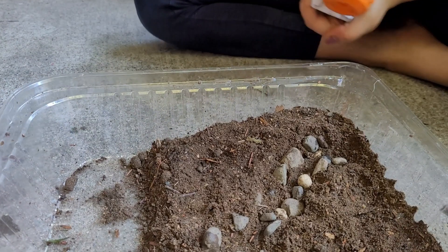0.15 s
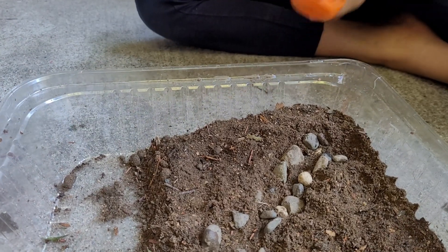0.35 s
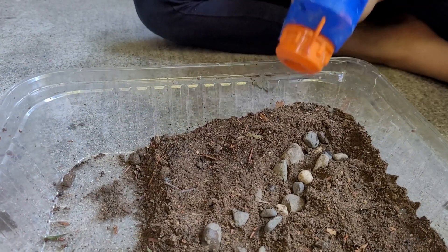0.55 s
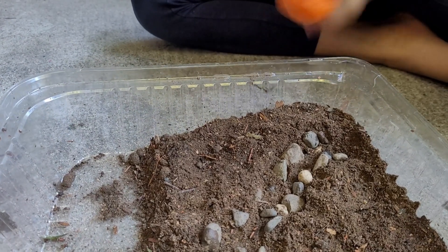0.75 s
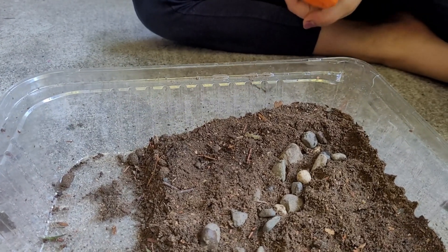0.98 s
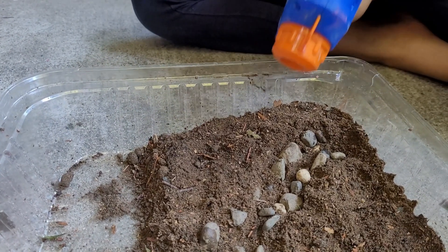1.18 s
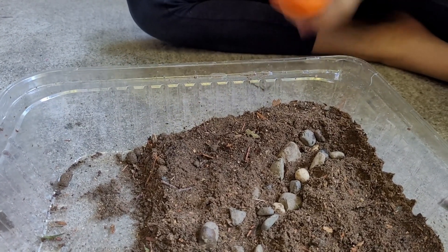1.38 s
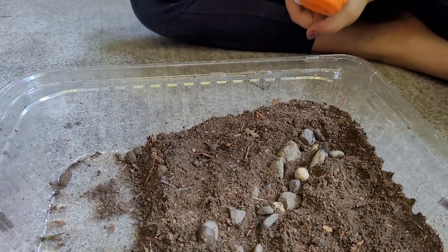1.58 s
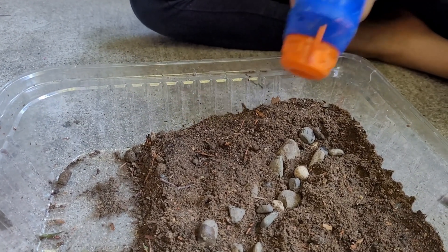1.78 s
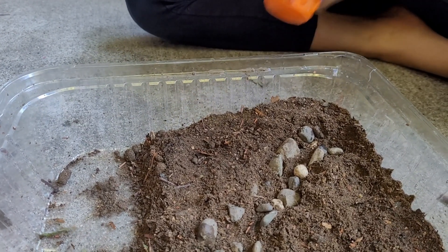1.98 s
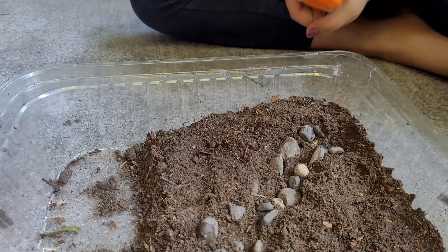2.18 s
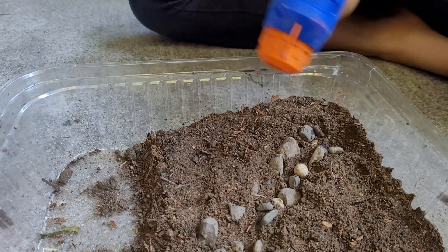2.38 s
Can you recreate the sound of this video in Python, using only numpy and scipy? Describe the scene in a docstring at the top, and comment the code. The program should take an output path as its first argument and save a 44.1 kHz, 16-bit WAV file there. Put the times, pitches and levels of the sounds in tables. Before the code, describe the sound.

A plastic toy water gun is pumped quickly, close by in a small, quiet room. Inward strokes hiss and end in hollow knocks at about 0.2, 0.9, 1.5 and 2.2 seconds. Outward strokes end in sharper knocks at 0.6, 1.2, 1.8 and 2.5 seconds. Faint rubber squeaks and light plunger taps come in between. Around 1.9 seconds the nozzle briefly sputters air and a little water.

```python
"""In a small carpeted room, a plastic toy water gun is pumped quickly over a plastic tub.
On every stroke sliding friction makes a hiss that rises with the plunger's speed, and the rubber seal
hums or squeaks at times. Impact on the stop excites the body's modes: a hollow knock going in, a sharper
one going out. After the third outward stroke the nozzle sputters air and a little water.
The loose plunger taps lightly; faint room noise and a deep rumble lie underneath."""
import sys
import numpy as np
from scipy import signal
from scipy.fft import rfft, irfft, next_fast_len
from scipy.io import wavfile

SR = 44100
rng = np.random.default_rng(int(sys.argv[2]) if len(sys.argv) > 2 else 0)


def output_pcm(signal):
    """Save a mono or channel-first signal as 16-bit PCM at the path in sys.argv[1].

    Samples are clipped to [-1, 1] before scaling.
    """
    pcm = np.clip(np.atleast_2d(signal).T, -1, 1) * 32767
    wavfile.write(sys.argv[1], SR, np.round(pcm).astype(np.int16))


N = 108045
T = np.arange(N) / SR


def from_db(db):
    """Amplitude ratio of a level in decibels."""
    return 10 ** (np.asarray(db) / 20)


def unit_rms(x):
    """Normalisation to unit mean power."""
    return x / np.sqrt(np.mean(x ** 2) + 1e-20)


def at_hz(points, hz):
    """Interpolation on a log-frequency axis."""
    freqs, values = np.transpose(points)
    return np.interp(np.log(np.maximum(hz, 1)), np.log(freqs), values)


def pan(db):
    """Left and right gains for a level difference."""
    return from_db(np.array([[.5], [-.5]]) * db)


def since(time):
    """Seconds after an onset, zero before it."""
    return np.maximum(T - time, 0)


def drift(cutoff_hz):
    """Low-pass random modulation of unit rms."""
    lowpass = signal.butter(2, cutoff_hz, fs=SR, output="sos")
    return unit_rms(signal.sosfilt(lowpass, rng.standard_normal(N)))


def roughness(spread_db, cutoff_hz):
    """Log-normal amplitude modulation of unit rms."""
    return unit_rms(from_db(spread_db * drift(cutoff_hz)))


# likeness of the two channels: (frequency [Hz], coherence [1])
COHERENCE = [(60, .87), (280, .92), (600, .7), (1300, .55), (2600, .45), (5000, .4), (7500, .72),
             (14000, .68)]
def stereo_white(size):
    """Partial coherence: a white spectrum, partly shared by two microphones, and its frequencies."""
    hz = np.fft.rfftfreq(size, 1 / SR)
    mid, side = rfft(rng.standard_normal((2, size)))
    alike = at_hz(COHERENCE, hz)
    return (np.sqrt(1 + alike) * mid + np.sqrt(1 - alike) * side * [[1], [-1]]) / np.sqrt(2), hz


# stereo balance: (frequency [Hz], left minus right [dB])
BALANCE = [(300, -0.7), (1200, 0.9), (2500, 3), (4400, 3), (6000, -1), (8400, -1.5), (11500, -.5),
           (14500, 2.5)]
def noise(spectrum):
    """Spectral shaping: stereo noise of unit rms, so the spectrum sets only its colour."""
    size = next_fast_len(N)
    white, hz = stereo_white(size)
    shaped = white * from_db(at_hz(spectrum, hz)) * pan(at_hz(BALANCE, hz))
    return unit_rms(irfft(shaped, size)[:, :N])


# spectra of the room noise and the rumble: (frequency [Hz], relative density [dB])
FLOOR_SPECTRUM = [(12, -29), (25, -11), (36, -19), (52, 6), (66, -5.5), (100, -11), (160, -14.5),
                  (280, -12), (600, -25), (1500, -30), (4000, -43), (9000, -47.5), (15500, -55)]
RUMBLE_SPECTRUM = [(25, -38), (42, -1), (53, 13), (64, -4.5), (110, -46), (400, -76)]
# rumble envelope: (time [s], relative level [dB])
RUMBLE_ENVELOPE = [(0, 18), (0.15, -8), (0.36, -4), (0.44, 16.5), (0.51, 7.5), (0.6, 20), (0.76, -5),
                   (1.3, -7.5), (2.3, -2), (2.45, 14)]
def background(floor_db=-50.5, rumble_db=-59.5):
    """Ambient noise: a stationary floor and a slowly amplitude-modulated rumble."""
    swell_db = np.interp(T, *np.transpose(RUMBLE_ENVELOPE))
    rumble = from_db(rumble_db + swell_db) * noise(RUMBLE_SPECTRUM)
    return rumble + from_db(floor_db) * noise(FLOOR_SPECTRUM)


# strength of the diffuse field: (frequency [Hz], level [dB])
REVERB_LEVEL = [(100, -7.5), (200, -7), (310, -12.5), (500, -10), (800, -2), (1300, -11), (2600, -3.5),
                (8000, -6.5), (15000, -6)]
# reverberation time: (frequency [Hz], T60 [s])
REVERB_T60 = [(150, 0.29), (400, 0.17), (1000, .21), (2800, 0.2), (8000, 0.19), (15000, 0.17)]
def reverberation(x, gap_s=0.0026):
    """Absorption makes the diffuse field decay exponentially, each band at its own rate."""
    size = 16384
    white, hz = stereo_white(size)
    t, tail = T[:size], 0
    centres = np.geomspace(100, 16000, 10)
    for centre, weights in zip(centres, np.eye(len(centres))):
        band = irfft(white * at_hz(np.c_[centres, weights], hz) * from_db(at_hz(REVERB_LEVEL, hz)))
        fade = from_db(-60 * t / at_hz(REVERB_T60, centre)) * (t > gap_s)
        tail += band * fade / np.sqrt(np.sum(fade ** 2))
    return signal.fftconvolve(x, tail, axes=1)[:, :N]


# echoes: (delay [s], gain [dB])
REFLECTIONS = [(.0064, -19), (0.0105, -15)]
def early_reflections(x, cutoff_hz=690):
    """Reflection from nearby surfaces returns delayed, duller copies of the sound."""
    dull = signal.sosfilt(signal.butter(1, cutoff_hz, fs=SR, output="sos"), x)
    return sum(from_db(db) * np.array([np.interp(T - delay, T, side, left=0) for side in dull])
               for delay, db in REFLECTIONS)


# left microphone against the right: (frequency [Hz], phase lag [rad])
PHASE_LAG = [(200, 0), (500, 0.02), (1300, 0.74), (1700, 0.5), (2100, 1.46), (3200, 1.68), (4400, .5),
             (5700, 1.5), (6600, -1)]
def direct_sound(x, bass_cut_hz=140):
    """A small source radiates little bass; its sound reaches the left microphone slightly late."""
    x = signal.sosfilt(signal.butter(3, bass_cut_hz, "high", fs=SR, output="sos"), x)
    size = next_fast_len(N + 2048)
    lag = at_hz(PHASE_LAG, np.fft.rfftfreq(size, 1 / SR))
    return irfft(rfft(x, size) * np.exp(1j * lag * [[-.5], [.5]]), size)[:, :N]


# light contacts: (time [s], level [dB])
TAP_EVENTS = [(0.013, -49), (0.032, -46), (0.079, -46.5), (0.446, -40.5), (0.694, -42), (0.742, -43),
              (0.768, -50.5), (1.126, -34), (1.301, -38.5), (1.332, -43.5), (1.371, -42.5), (1.783, -47),
              (2.012, -32), (2.079, -39)]
# their spectrum: (frequency [Hz], relative density [dB])
TAP_SPECTRUM = [(120, -11), (300, -2), (480, 9), (750, -4.5), (1300, -5), (2500, -13.5), (8000, -20.5),
                (15000, -44)]
def plunger_taps(attack_s=0.0018, decay_s=0.0059):
    """Light impacts of the loose plunger give dull, quickly damped noise bursts."""
    envelope = sum(from_db(db) * np.minimum(since(time) / attack_s, 1) * np.exp(-since(time) / decay_s)
                   for time, db in TAP_EVENTS)
    return envelope * noise(TAP_SPECTRUM)


# spurts: (time [s], level [dB], attack [s], decay [s], spray offset [dB])
NOZZLE_SPURTS = [(1.868, -14, 0.0054, .007, -0.5), (1.885, -16.5, 0.0032, 0.027, -2),
                 (1.91, -15, 0.013, 0.016, 1.5)]
# their low and bright parts: (frequency [Hz], relative density [dB])
SPLUTTER_SPECTRUM = [(70, -13), (150, 5), (230, 2), (310, -3), (500, 5.5), (750, -1.5), (1000, -4.5),
                     (1900, -3.5), (2650, -10), (2950, -15.5), (3600, -22), (4500, -47)]
SPRAY_SPECTRUM = [(1200, -34), (2500, -1), (5000, 4.5), (6000, -3.5), (8200, 4.5), (9600, -7.5),
                  (10800, -1), (13000, -8.5), (15500, -11)]
def nozzle_sputter(spray_db=-8):
    """Unsteady flow of air and water gives ragged spurts: a low splutter and a bright spray."""
    splutter = spray = 0
    for time, db, attack, decay, offset_db in NOZZLE_SPURTS:
        envelope = from_db(db) * np.minimum(since(time) / attack, 1)
        envelope *= np.exp(-since(time + attack) / decay)
        splutter += envelope
        spray += envelope * from_db(offset_db + spray_db)
    ragged = roughness(spread_db=1, cutoff_hz=630)
    return ragged * (splutter * noise(SPLUTTER_SPECTRUM) + spray * noise(SPRAY_SPECTRUM))


# inward and outward strokes: (start [s], stop [s], hiss level [dB], knock gain [dB])
PUSH_STROKES = [(0.168, 0.2483, -33, 2.5), (0.83, 0.9076, -33.5, 1.5), (1.455, 1.5394, -34.5, 1),
                (2.085, 2.1631, -30, 0.5)]
PULL_STROKES = [(0.454, 0.583, -29, 0), (1.103, 1.213, -29, 0.1), (1.725, 1.8387, -26.5, 1),
                (2.324, 2.468, -28.5, -1)]
# friction spectra: (frequency [Hz], relative density [dB])
PUSH_FRICTION = [(90, -39), (180, 13), (300, 10), (480, 11.5), (750, 12), (950, 3.5), (1300, 9.5),
                 (1700, 6.5), (3200, 4), (6500, 2.5), (8200, 4.5), (9800, 1), (12000, -0.5), (15500, -9.5)]
PULL_FRICTION = [(90, -1.5), (200, 10), (330, 8.5), (600, 12.5), (850, 3), (1400, 7), (3000, 2.5),
                 (4300, 5), (6500, -2), (8300, 3.5), (9800, -1.5), (11800, -1.5), (15500, -12)]
def sliding_hiss(strokes, spectrum, speed_power, release_s=0.0087):
    """Friction noise grows as a power of the plunger's speed and dies away at the stop."""
    envelope = 0
    for start, stop, db, _ in strokes:
        progress = np.clip((T - start) / (stop - start), 0, 1)
        speed = np.sin(np.pi / 2 * progress ** 1.35)
        envelope += from_db(db) * speed ** speed_power * np.exp(-since(stop) / release_s)
    return envelope * roughness(spread_db=1.04, cutoff_hz=150) * noise(spectrum)


# hum of the seal: (harmonic number [1], level [dB])
HUM_HARMONICS = [(1, -33.5), (2, -37), (3, -44.5)]
# squeaks: (time [s], duration [s], centre frequency [Hz], relative glide [1], level [dB])
SEAL_SQUEAKS = [(0.482, 0.032, 1242, 0.11, -40), (0.868, 0.018, 1320, 0.029, -34),
                (1.503, 0.021, 2880, .03, -28), (2.15, .018, 3280, 0.039, -26),
                (2.353, 0.024, 496, 0.034, -35), (2.375, 0.019, 1316, .14, -28.5)]
def rubber_seal(hum_end_hz=305.2, rise_hz_per_s=1000, hum_s=.07):
    """Friction-induced vibration: the seal hums, rising late in each pull, and squeaks now and then."""
    out = np.zeros(N)
    waver = 1 + 0.034 * drift(cutoff_hz=95)
    for _, stop, _, _ in PULL_STROKES:
        time_left = np.clip(stop - T, 0, hum_s)
        phase = 2 * np.pi * np.cumsum((hum_end_hz - rise_hz_per_s * time_left) * waver) / SR
        hum = sum(from_db(db) * np.sin(k * phase) for k, db in HUM_HARMONICS)
        out += np.sin(np.pi * time_left / hum_s) * hum
    rough = roughness(spread_db=4, cutoff_hz=270)
    for time, duration, hz, glide, db in SEAL_SQUEAKS:
        progress = np.clip((T - time) / duration, 0, 1)
        pitch = hz * (1 + glide * (progress - .5)) * np.sqrt(waver)
        envelope = from_db(db) * rough * np.sin(np.pi * progress) ** 2
        out += envelope * np.sin(2 * np.pi * np.cumsum(pitch) / SR)
    return out


# lasting modes: (frequency [Hz], level after a push [dB], level after a pull [dB], T60 [s])
RING_MODES = [(211.3, -38, -29.5, 0.21), (287, -24.5, -34.5, 0.15), (376, -16.5, -22.5, 0.074),
              (468, -29.5, -46, 0.094), (545.5, -31, -25.5, 0.17), (748.6, -16.5, -21, .13),
              (800, -30, -21.5, 0.16), (938, -38.5, -36.5, 0.2), (1310, -35, -36, .09),
              (2345, -34.5, -45, 0.15)]
def barrel_ring(swell_s=0.0054, phase_spread_rad=0.23):
    """Free vibration: the hollow barrel and its surroundings ring on after each knock."""
    out = np.zeros((2, N))
    for direction, strokes in enumerate((PUSH_STROKES, PULL_STROKES)):
        for _, stop, _, knock_db in strokes:
            active = (T >= stop) & (T < stop + .3)
            t = T[active] - stop
            onset = 1 - np.exp(-(t / swell_s) ** 2)
            for hz, *levels_db, t60 in RING_MODES:
                decay = from_db(knock_db + levels_db[direction] + rng.normal() - 60 * t / t60)
                channel_phase = phase_spread_rad * rng.standard_normal((2, 1))
                out[:, active] += onset * decay * np.sin(2 * np.pi * hz * t + channel_phase)
    return out


# body modes: (frequency [Hz], level [dB], rise time [s], delay [s], left minus right [dB])
PUSH_MODES = [(435, -2.5, 0.0019, 0.0015, -1.5), (312.4, -14, 0.0038, 0.00098, -1.5),
              (893, -14, 0.0017, 0.00043, 2), (1327, -11.5, 0.0026, 0.00023, -2),
              (2290, -21, 0.00083, 0.00013, 5.5)]
PULL_MODES = [(490, -10, 0.003, 0.00025, 1.5), (233, -24, 0.0045, 0.00039, -0.5),
              (1284, -4, 0.0011, 0.00012, 1), (2017, -14, 0.0004, 0.00027, 3.5)]
# spectra of the contact crack: (frequency [Hz], relative density [dB])
PUSH_CONTACT = [(100, -35), (300, -3.5), (900, -4.5), (2400, -6.5), (4000, -11.5), (6500, -18), (8400, -14),
                (10000, -20.5), (12500, -17.5), (15500, -26.5)]
PULL_CONTACT = [(100, -33.5), (300, -18), (900, -11.5), (2200, -7.5), (4000, -16.5), (6500, -24),
                (9000, -25.5), (15500, -39.5)]
def stop_knocks(strokes, modes, contact, crack_db=-12, attack_s=.0005, decay_s=0.004):
    """Impact excitation: the plunger hits its stop with a crack and drives heavily damped body modes."""
    crack = from_db(crack_db) * noise(contact)
    out = np.zeros((2, N))
    for _, stop, _, knock_db in strokes:
        active = (T >= stop) & (T < stop + .06)
        t = T[active] - stop
        hit = crack[:, active] * (1 - np.exp(-t / attack_s)) * np.exp(-t / decay_s)
        for hz, db, rise, delay, pan_db in modes:
            age = np.maximum(t - delay, 0)
            envelope = from_db(db) * (age / rise * np.exp(1 - age / rise)) ** 2
            hit -= pan(pan_db) * envelope * np.sin(2 * np.pi * hz * age)
        out[:, active] += from_db(knock_db) * hit
    return out


def scene():
    """Superposition of the toy, the room's response and the background."""
    hiss = sliding_hiss(PUSH_STROKES, PUSH_FRICTION, speed_power=1.45)
    hiss += sliding_hiss(PULL_STROKES, PULL_FRICTION, speed_power=1.75)
    knocks = stop_knocks(PUSH_STROKES, PUSH_MODES, PUSH_CONTACT)
    knocks += stop_knocks(PULL_STROKES, PULL_MODES, PULL_CONTACT)
    ring = barrel_ring()
    toy = direct_sound(hiss + knocks + rubber_seal() + nozzle_sputter() + plunger_taps())
    return toy + ring + early_reflections(toy) + reverberation(toy) + background()


def record(dry):
    """Soft saturation rounds the highest peaks; a steep low-pass limits the bandwidth."""
    rounded = dry / (1 + np.abs(dry) ** 6) ** (1 / 6)
    return signal.sosfilt(signal.ellip(12, .1, 90, 15900, fs=SR, output="sos"), rounded)


dry = scene()
out = record(dry)
output_pcm(out)
```